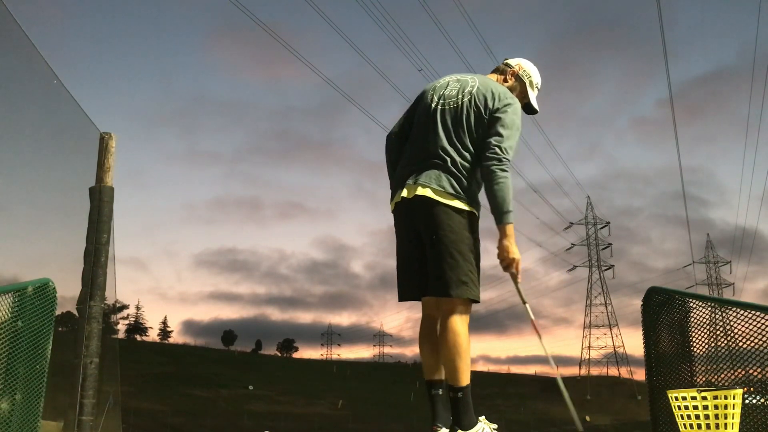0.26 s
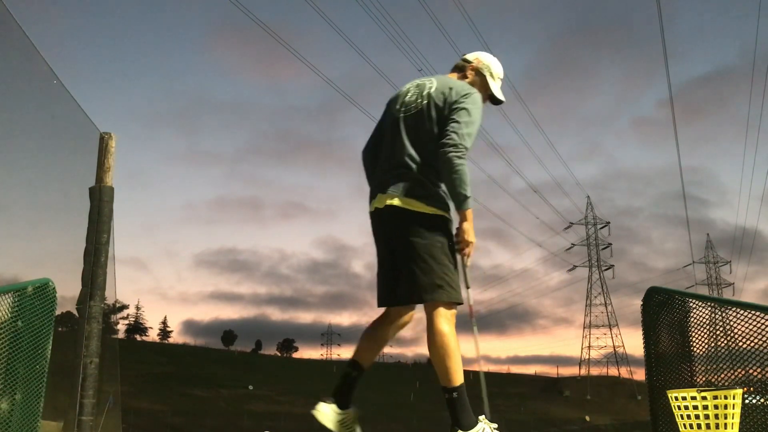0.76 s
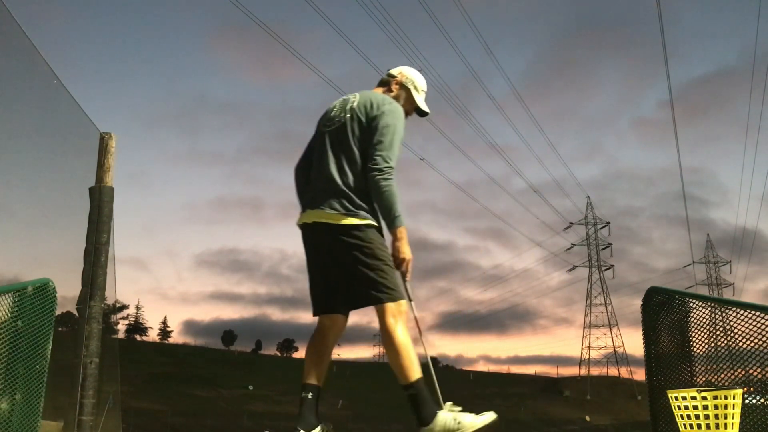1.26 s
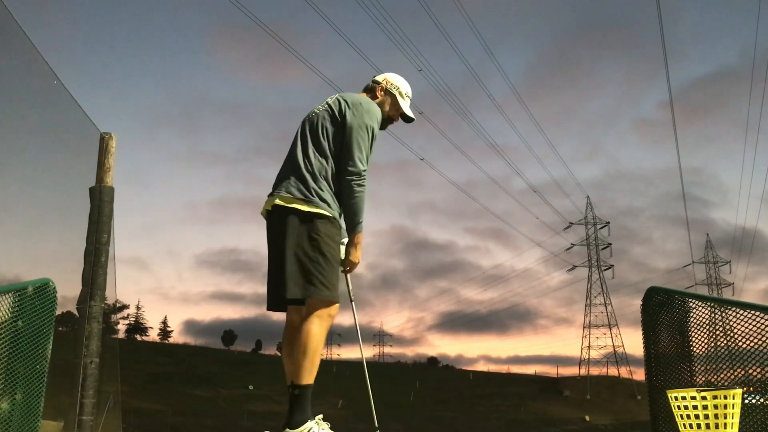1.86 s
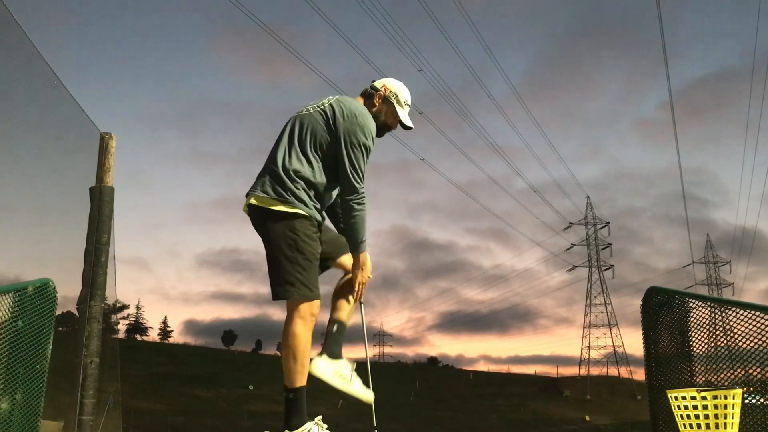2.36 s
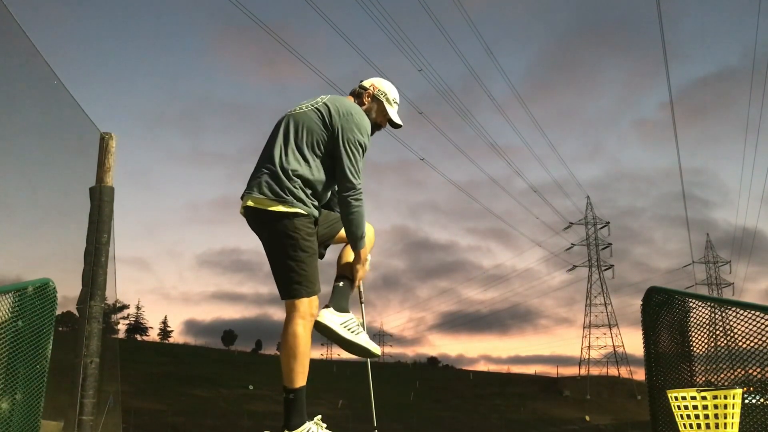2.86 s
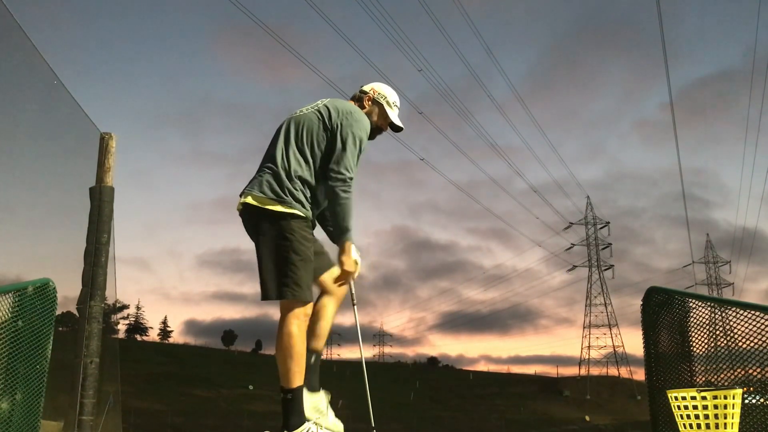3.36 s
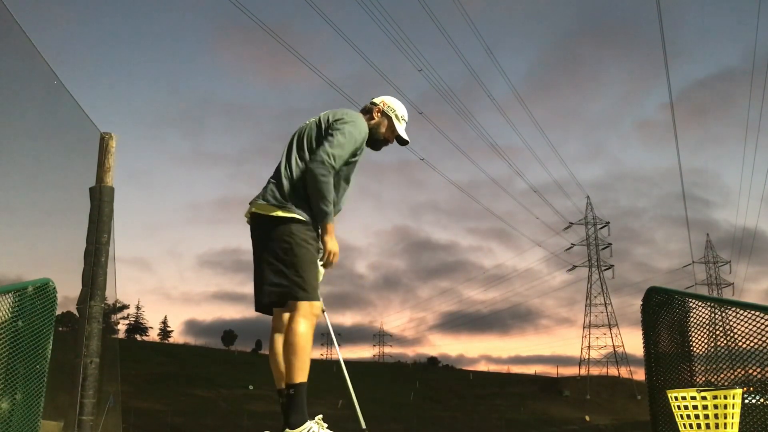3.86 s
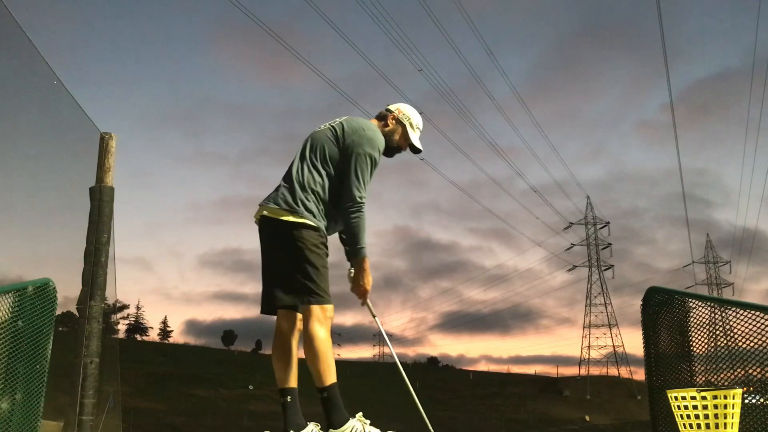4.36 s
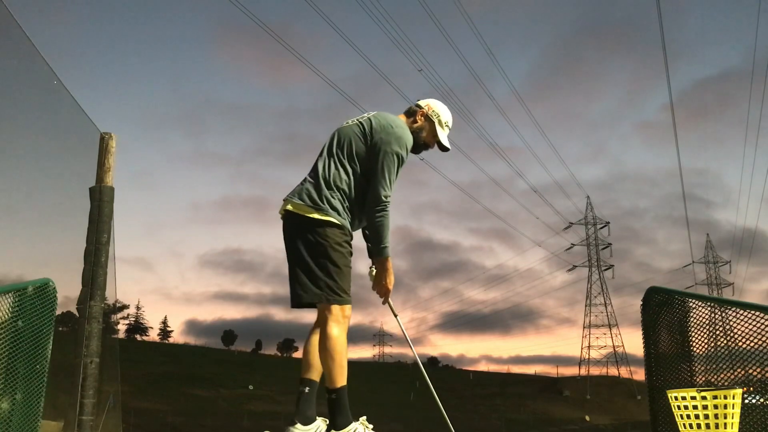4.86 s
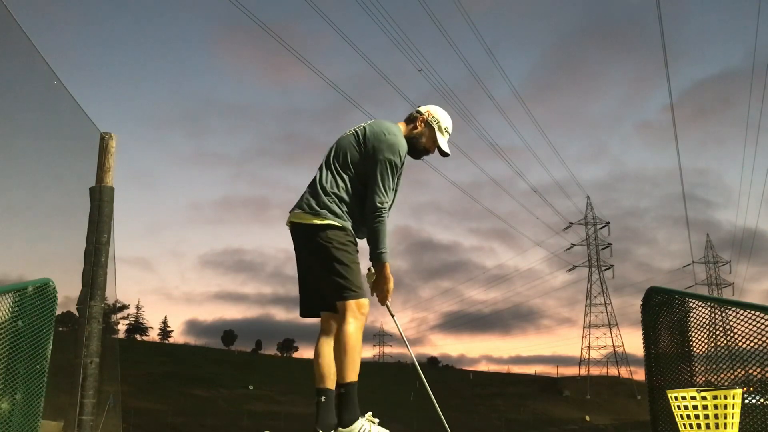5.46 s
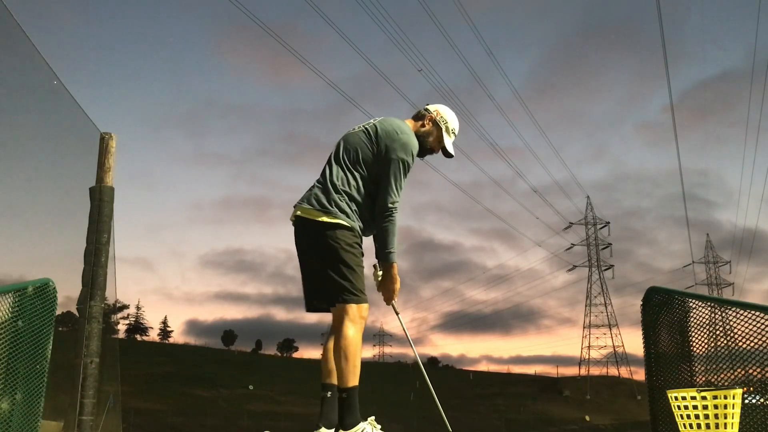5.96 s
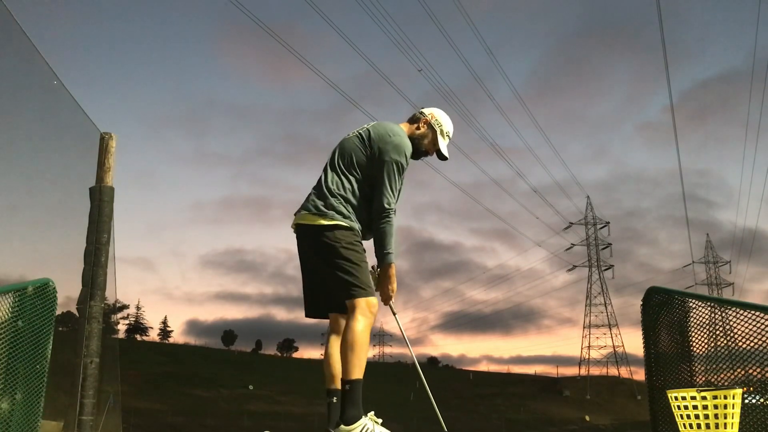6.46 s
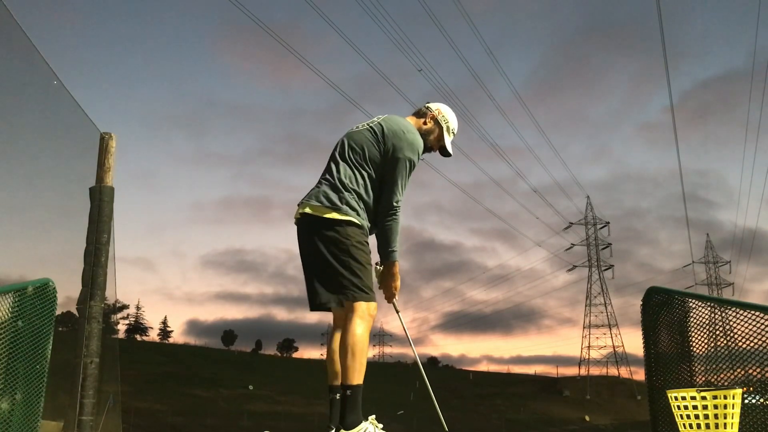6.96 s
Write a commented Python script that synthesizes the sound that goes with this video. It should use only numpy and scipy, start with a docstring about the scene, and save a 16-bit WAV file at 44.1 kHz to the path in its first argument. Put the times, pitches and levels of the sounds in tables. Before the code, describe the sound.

Low, steady motor hum and distant traffic fill an open range. Early come a faint bird peep, light shoe scuffs and a tiny far ball hit. A clearer wood shot snaps from another bay, its echo grainy. Later the drone rises in pitch while evenly spaced, arched bird whistles repeat. Near the end, a close club swishes, brushes the mat and cracks the ball sharply, leaving the hum.

```python
"""Open driving range at dusk

One microphone hears a far iron, a metal wood some bays off and a near iron strike balls: each is a set of
decaying modes, and nets and fences scatter the crack back as grainy noise. The near shaft swishes first, a
noisy tone in hiss. Shoes scuff a mat and cloth rustles, both coloured noise, among small modal ticks.
A distant bird repeats an arched sine whistle, after one peep from another. Behind them a far
eight-cylinder engine drones in multiples of its firing rate, other motors glide, and traffic roars as noise."""
import sys
import numpy as np
from scipy import signal
from scipy.fft import rfft, irfft
from scipy.io import wavfile
from scipy.ndimage import uniform_filter1d

SR = 44100
rng = np.random.default_rng(int(sys.argv[2]) if len(sys.argv) > 2 else 0)


def waveform_to_disk(signal):
    """Save audio, clipped to [-1, 1], as 16-bit WAV at the path in sys.argv[1]."""
    frames = np.transpose(np.atleast_2d(signal))
    scaled = np.clip(frames, -1, 1) * 32767
    samples = np.round(scaled).astype(np.int16)
    wavfile.write(sys.argv[1], SR, samples)


N = 318402  # length in samples
TOP_HZ = 15800  # the recorder's upper limit

# Burst tables, here and below: each row is start in seconds, attack in s, hold in s, level in dB rms,
# fade by 60 dB in s. Colour tables: each row is frequency in Hz, relative density in dB per Hz.

# The near iron, the wood some bays off and the far iron; the near head then knocks the mat once more.
# Each: start in seconds, peak in dB before scatter, scatter in dB, scatter fade by 60 dB in s.
NEAR_STRIKE = (6.4753, -5.5, -35, .025)
WOOD_STRIKE = (2.7032, -25, -28, .05)
FAR_STRIKE = (1.1009, -41, -28, .05)
MAT_KNOCK = (6.4897, -20, -40, .02)
# What rings at each blow: ball and head, and for the knock, the head on the mat.
# Each row: frequency in Hz, relative level in dB, fade by 60 dB in s.
NEAR_MODES = [(300, -21.5, .025), (650, -19.5, 0.016), (1125, -17.5, .025), (1435, -11.5, 0.031),
              (2020, -9.5, 0.021), (2420, -8.5, 0.023), (2680, 0.5, .005), (3304, -8, .02),
              (4400, -21, 0.025), (5980, -6.5, .005), (6700, -25.5, .04), (7680, -23, .03),
              (8730, -26, 0.093), (10340, -18, .006), (12050, -30, .06), (14000, -22.5, .006)]
WOOD_MODES = [(483, -6.5, .04), (600, -8, .04), (845, -4.5, 0.035), (1462, -6.5, .03), (2250, 5.5, 0.0064),
              (3550, -19, 0.028), (4190, -16, 0.027), (5740, -24, .15), (6050, -24, .15), (6400, -9, .03),
              (8610, -12, 0.016), (10000, -10, 0.014), (13800, -17, 0.0055)]
FAR_MODES = [(400, -2, .03), (565, 3, 0.048), (854, -5, .02), (3220, -4, .015), (4260, -8, .01),
             (8400, -20, .006)]
MAT_KNOCK_MODES = [(500, -4.5, 0.0083), (1100, 0, 0.0097), (1800, 0, .007), (2700, -7, 0.0056)]
# Scattered return of each strike: bursts, then colour.
NEAR_RETURN = [(6.475, .006, .015, -36, .055), (6.5, .01, .055, -62, .1)]
NEAR_RETURN_COLOUR = [(300, -7), (800, -7), (2000, -2.5), (3500, -9.5), (5200, -13.5), (6900, -5.5),
                      (7900, -14), (8750, -3.5), (9600, -13), (11000, -11), (12050, -2.5), (13200, -17),
                      (15500, -18)]
WOOD_RETURN = [(2.702, .003, .004, -41, .09), (2.702, .003, .04, -50, .85)]
WOOD_RETURN_COLOUR = [(400, -6), (1500, -2), (2500, -9.5), (3800, -5), (5000, -10.5), (5600, -4.5),
                      (6100, 0.5), (6800, -8.5), (8500, -11.5), (10500, -14.5), (13000, -18),
                      (15500, -21.5)]
FAR_RETURN = [(1.098, .004, .01, -60, .8)]
FAR_RETURN_COLOUR = [(800, -8.5), (2500, 3.5), (4300, 3), (5500, -4.5), (9000, -20)]
# The far netting sends the near strike back late: bursts, then colour.
NET_RETURN = [(6.493, .012, .013, -46, .055), (6.52, .01, .08, -56, .5), (6.55, .1, .04, -54, .11)]
NET_RETURN_COLOUR = [(400, -5), (900, -1.5), (2000, 2.5), (3300, -3.5), (5000, -9), (7000, -15.5),
                     (10000, -26.5), (15000, -31.5)]
# The near sole hits the mat, then slides to the ball: bursts, then colour.
SOLE_BRUSH = [(6.456, .005, .002, -22, .015), (6.457, .003, .015, -33.5, .05)]
SOLE_BRUSH_COLOUR = [(100, -1.5), (266, 1), (768, -14.5), (1830, -10), (3000, -13.5), (5000, -22),
                     (8000, -31), (12000, -37.5), (16000, -42.5)]


def strikes():
    """Blows ring ball and head; nets and fences scatter them back, and the near head also meets the mat."""
    near = ring(*NEAR_STRIKE, NEAR_MODES) + wash(NEAR_RETURN, NEAR_RETURN_COLOUR, 1.5)
    near = near + wash(NET_RETURN, NET_RETURN_COLOUR, 1.2)
    mat = wash(SOLE_BRUSH, SOLE_BRUSH_COLOUR, 1.2) + ring(*MAT_KNOCK, MAT_KNOCK_MODES)
    wood = ring(*WOOD_STRIKE, WOOD_MODES) + wash(WOOD_RETURN, WOOD_RETURN_COLOUR, 1.6)
    far = ring(*FAR_STRIKE, FAR_MODES) + wash(FAR_RETURN, FAR_RETURN_COLOUR, 2.5)
    return near + mat + wood + far


# The near shaft cutting the air: one burst whose level is that of the tone, then the colour of its hiss.
SWISH = (6.385, .055, .006, -43, .07)
SWISH_COLOUR = [(300, 4.5), (1000, -3), (3000, -13.5), (8000, -22.5), (15000, -28.5)]
SWISH_HISS_DB = -7  # relative to the tone
SWING_S, SWING_WIDTH_S, WAKE_HZ = 6.44, .05, 610  # fastest moment, spread in time, wake pitch then


def swish():
    """Vortices shed by the shaft: a narrow noisy tone that follows the speed, in a broad hiss."""
    speed = 1 / (1 + ((np.arange(N) / SR - SWING_S) / SWING_WIDTH_S) ** 2 / 2)
    turn = 2 * np.pi * np.cumsum(WAKE_HZ * speed) / SR
    tone = walk(300) * np.cos(turn) + walk(300) * np.sin(turn)
    hiss = undb(SWISH_HISS_DB) * coloured(rng.standard_normal(N), SWISH_COLOUR)
    return burst(*SWISH) * (tone + hiss)


# Shoes on the mat: bursts, then colour.
SCUFFS = [(.338, .01, .03, -62.5, .5), (.458, .004, .005, -70, .55), (1.27, .018, .08, -62, 1.1),
          (1.44, .03, .03, -66, .3), (1.71, .05, .04, -62.5, .16)]
SCUFF_COLOUR = [(500, -2.5), (1500, 4), (3000, -2.5), (5500, -9.5), (8000, -21), (12000, -30.5)]


def scuffs():
    """Shoes rub the mat: very grainy noise, strongest in the middle of the range."""
    return wash(SCUFFS, SCUFF_COLOUR, 2.9)


# Cloth moving: bursts, then colour.
RUSTLES = [(2.132, .006, .01, -86, 1.), (2.2, .26, .24, -82.5, 1.), (2.95, .13, .02, -77.5, .9),
           (3.163, .005, .001, -72, .035), (3.55, .12, .02, -77.5, .45)]
RUSTLE_COLOUR = [(4000, -9), (8000, -8), (12500, 3.5), (15500, -4)]


def rustles():
    """Cloth rubs on itself: faint grainy noise, strongest in the treble."""
    return wash(RUSTLES, RUSTLE_COLOUR, 2.5)


# Small ticks. Each row: start in seconds, peak in dB before scatter, centre in Hz, fade by 60 dB in s.
TICKS = [(.781, -55, 12000, .006), (1.092, -51, 3750, .015), (3.1672, -49, 3900, 0.005),
         (3.1672, -68, 12080, 0.005), (5.583, -47, 899, .01), (5.71, -61, 5000, .01)]


def ticks():
    """Tiny hard contacts: a broad cluster of very short modes."""
    out = np.zeros(N)
    for s, db, hz, t60_s in TICKS:
        modes = [(min(hz * ratio, TOP_HZ), 0, t60_s) for ratio in (.7, .85, 1, 1.15, 1.3)]
        out = out + ring(s, db, -24, 0.03, modes)
    return out


# A distant bird's whistles. Each row: start in seconds, length in s, top pitch in Hz,
# level in dB rms before dip, flutter and echo.
WHISTLES = [(4.083, .085, 2913, -62), (4.306, .088, 2890, -64), (4.525, .085, 2874, -63),
            (4.743, .085, 2850, -63), (4.967, .085, 2840, -62.5), (5.188, .085, 2808, -63),
            (5.402, .075, 2763, -63), (5.616, .071, 2740, -65), (5.845, .075, 2762, -66)]
WHISTLE_START_HZ, WHISTLE_DIP_DB = 2480, -6  # each whistle is weakest near the top of its arch
# Another bird's peep: start in seconds, attack in s, hold in s, level in dB rms before flutter and echo,
# fade by 60 dB in s, first pitch in Hz, glide in Hz per s.
PEEP = (.245, .015, .06, -69.5, .1, 2290, -400)


def birds():
    """Arched whistles and a peep flutter in the air and are smeared by echoes from trees and ground."""
    out = glide(*PEEP)
    for s, length_s, top_hz, db in WHISTLES:
        u = np.arange(int(length_s * SR)) / (length_s * SR)  # 0 to 1 through the whistle
        # distance below the top pitch: 1 at the start, 0 at the top
        arch = np.where(u < .38, (1 - u / 0.375) ** 2, .85 * ((u - .38) / .62) ** 2)
        hz = top_hz - (top_hz - WHISTLE_START_HZ) * arch
        dip = undb(np.interp(u, [.15, .45, .75], [0, WHISTLE_DIP_DB, 0]))
        edges = np.clip(np.minimum(u, 1 - u) / 0.097, 0, 1)
        i = int(s * SR)
        out[i:i + len(u)] = undb(db) * dip * edges * np.sin(2 * np.pi * np.cumsum(hz) / SR)
    out = np.sqrt(2) * out * undb(2.4 * walk(110))
    t = np.arange(SR // 2) / SR
    echo = rng.standard_normal(len(t)) * 1000. ** (-t / 0.5) * undb(-36.5) * (t > .01)
    echo[int(.033 * SR)] += undb(-10.5)  # one strong reflector
    return out + signal.fftconvolve(out, echo)[:N]


# The far engine. Each row: time in seconds, firing rate in Hz, then the 1st, 2nd and 3rd multiple of it
# in dB rms before waver.
ENGINE = [(0, 79.2, -42, -41, -45), (.36, 80.1, -40.5, -42.5, -48), (.6, 79.8, -37.5, -39.5, -51.5),
          (1.0, 78.9, -38, -40.5, -48.5), (1.4, 77.8, -36.5, -45, -51.5), (1.8, 76.8, -39, -41, -49),
          (2.25, 76.3, -42.5, -43, -51.5), (2.52, 76, -38.5, -37.5, -60), (2.78, 75.7, -39.5, -38.5, -46),
          (3.2, 75.6, -41.5, -36, -52), (3.48, 75.5, -43.5, -39.5, -70), (3.62, 75.5, -38, -42, -70),
          (3.9, 76.8, -38.5, -48, -66), (4.08, 78.1, -41, -47, -63), (4.45, 80.3, -33.5, -49, -56),
          (4.85, 82.2, -32.5, -50.5, -58), (5.16, 83.1, -41, -63, -66), (5.28, 83.3, -37.5, -63, -65),
          (5.5, 84.1, -43.5, -68, -64), (5.75, 84.2, -36.5, -59, -68), (5.88, 84.2, -46, -60, -64),
          (6.45, 84.9, -46, -57, -64), (6.72, 84.4, -39, -57, -59), (6.86, 83.8, -44, -54, -55.5),
          (7.08, 82.3, -38.5, -60, -61), (7.22, 80.4, -40.5, -57, -67)]
# Phase of each of those multiples in radians; it gives the sawtooth lean.
ENGINE_PHASE = [0, 1.4, 1.5]
# Weak orders: cylinders differ, so some sound between the multiples; the 4th and 5th multiples are faint too.
# Each row: multiple, level in dB rms before waver.
WEAK_ORDERS = [(1.25, -63.5), (2.5, -68), (4, -65.5), (5, -71.5)]
# The order at 1.75 times the firing rate. Each row: time in seconds, level in dB rms before waver.
LOPE = [(0, -54), (1.3, -57), (2, -50.5), (3.2, -54), (3.9, -58), (7.22, -59)]


def engine():
    """An eight-cylinder's multiples turn on one phase; they waver on their way through the air."""
    hz, *levels = along(ENGINE)
    turn = 2 * np.pi * np.cumsum(hz) / SR
    out = np.zeros(N)
    for k, db in enumerate(levels):
        out = out + undb(db + 0.8 * walk(25) + 1.1 * walk(9)) * np.cos((k + 1) * turn + ENGINE_PHASE[k])
    for multiple, db in WEAK_ORDERS:
        out = out + undb(db + 3.2 * walk(2.5)) * np.sin(multiple * turn)
    out = out + undb(along(LOPE)[0] + 2.5 * walk(5)) * np.sin(1.75 * turn)
    return np.sqrt(2) * out


# Other motors further off. Each row: start in seconds, swell in s, hold in s, level in dB rms before
# approach and waver, fade by 60 dB in s, first pitch in Hz, glide in Hz per s.
MOTORS = [(.1, .4, .3, -49, 5., 72, -2.2), (3.1, .5, 3.7, -56.5, 1., 207, 4.3),
          (3.8, .25, .03, -51, .6, 286, 0.5), (4.1, .3, .5, -60, 1.4, 283, -.5)]
MOTORS_NEARING_DB_S = .8  # dB per s


def motors():
    """Gliding tones grow louder as the motors approach, and waver on their way through the air."""
    nearing_db = MOTORS_NEARING_DB_S * (np.arange(N) - N / 2) / SR  # 0 dB at mid-scene
    return np.sqrt(2) * sum(undb(nearing_db + 2.2 * walk(6)) * glide(*row) for row in MOTORS)


# Colour of the distant road.
TRAFFIC_COLOUR = [(25, -26), (45, -4), (70, 2.5), (130, -1), (230, -5.5), (330, -14.5), (500, -17),
                  (900, -18), (1500, -25.5), (2500, -36), (4200, -42), (7000, -51.5), (10500, -53.5),
                  (13000, -55.5)]
TRAFFIC_DB = -46.5  # rms before the swells


def traffic():
    """Distant road roar; octave bands swell a little on their own."""
    spectrum = rfft(coloured(rng.standard_normal(N), TRAFFIC_COLOUR))
    octave = np.log2(np.arange(1, len(spectrum) + 1) * SR / N / 31.25)
    out = np.zeros(N)
    for k in range(10):
        share = np.clip(1 - np.abs(np.clip(octave, 0, 9) - k), 0, 1)  # bands crossfade
        swell = undb(0.5 * walk(1.4) + 1.1 * walk(10))
        out = out + swell * irfft(spectrum * share, N)
    return undb(TRAFFIC_DB) * out


def ring(s, peak_db, scatter_db, scatter_s, modes):
    """A blow sets decaying modes going; ground and bay walls repeat it in a dense fading swarm."""
    t = np.arange(SR // 2) / SR
    blow = np.zeros(len(t))
    for k, (hz, db, t60_s) in enumerate(modes):
        sign = (-1) ** k  # neighbouring modes move against each other
        blow = blow + sign * undb(db) * np.sin(2 * np.pi * hz * t) * 1000. ** (-t / t60_s)
    blow = blow * (1 - np.exp(-t / 0.0001))  # soft onset: what is struck gives a little first
    swarm = undb(scatter_db) * rng.standard_normal(len(t)) * 1000. ** (-t / scatter_s)
    heard = blow + signal.fftconvolve(blow, swarm)[:len(t)]
    out, i = np.zeros(N), int(s * SR)
    out[i:i + len(t)] = heard * undb(peak_db) / np.abs(blow).max()
    return out


def wash(rows, colour, grain_db):
    """Coloured noise in bursts; fibres and scatterers make it grainy."""
    gain = np.sqrt(sum(burst(*row) ** 2 for row in rows))
    return gain * coloured(rng.standard_normal(N) * undb(grain_db * walk(400)), colour)


def glide(s, attack_s, hold_s, db, t60_s, hz, hz_per_s):
    """A tone whose pitch slides steadily, under a burst; peak 1 at 0 dB."""
    t = np.arange(N) / SR - s
    return burst(s, attack_s, hold_s, db, t60_s) * np.sin(2 * np.pi * (hz * t + hz_per_s * t ** 2 / 2))


def burst(s, attack_s, hold_s, db, t60_s):
    """Gain of one event: swell, hold, exponential fade."""
    out, i = np.zeros(N), int(s * SR)
    t = np.arange(min(N - i, int((attack_s + hold_s + 2 * t60_s) * SR))) / SR
    fade_db = -60 * np.maximum(t - attack_s - hold_s, 0) / t60_s
    out[i:i + len(t)] = undb(db + fade_db) * np.minimum(t / attack_s, 1) ** 2
    return out


def coloured(x, colour):
    """Noise x given a spectrum, rms 1; it falls away below the first row and stays level above the last."""
    hz, db = np.transpose(colour)
    log_hz = np.log(np.arange(1, N // 2 + 2) * SR / N)
    below_db = 11 * np.maximum(np.log(hz[0]) - log_hz, 0)
    y = irfft(rfft(x) * undb(np.interp(log_hz, np.log(hz), db) - below_db), N)
    return y / np.sqrt(np.mean(y ** 2))


def walk(rate):
    """Random levels held 1 / rate s and smoothed twice; spread near 1."""
    k = int(SR / rate)
    steps = np.repeat(rng.standard_normal(N // k + 1), k)
    return 1.25 * uniform_filter1d(uniform_filter1d(steps, k), k)[:N]


def along(rows):
    """Columns of a curve, after its time column, at every sample."""
    s, *columns = np.transpose(rows)
    return [np.interp(np.arange(N) / SR, s, column) for column in columns]


def undb(db):
    """dB to gain."""
    return 10 ** (np.asarray(db) / 20)


def scene():
    """Everything reaches one microphone."""
    golfers = strikes() + swish() + scuffs() + rustles() + ticks()
    return (golfers + birds() + engine() + motors() + traffic())[None]


# Dips in the microphone's response. Each row: centre in Hz, width in Hz, depth in dB.
MICROPHONE = [(4820, 250, -3.5), (7800, 650, -2), (10500, 1000, -2.5)]


def record(dry):
    """The microphone's housing dips a few bands; the recorder cuts the top."""
    f = np.arange(N // 2 + 1) * SR / N
    db = sum(depth * np.exp(-((f - hz) / width) ** 2) for hz, width, depth in MICROPHONE)
    heard = irfft(rfft(dry) * undb(db), N)
    return signal.sosfilt(signal.ellip(10, .2, 70, TOP_HZ, fs=SR, output="sos"), heard)


dry = scene()
out = record(dry)
waveform_to_disk(out)
```